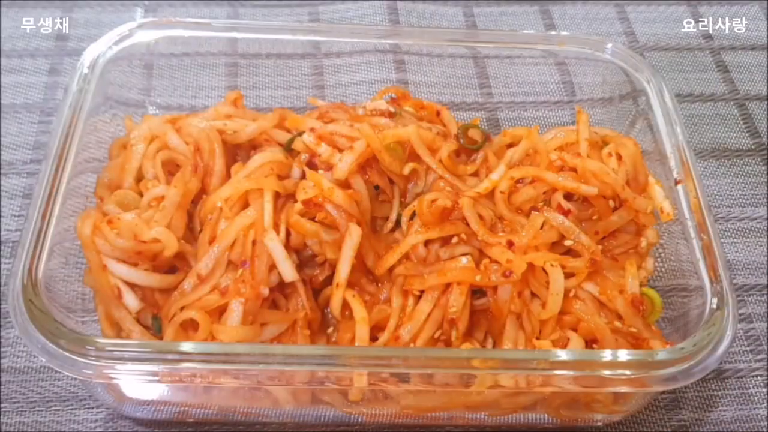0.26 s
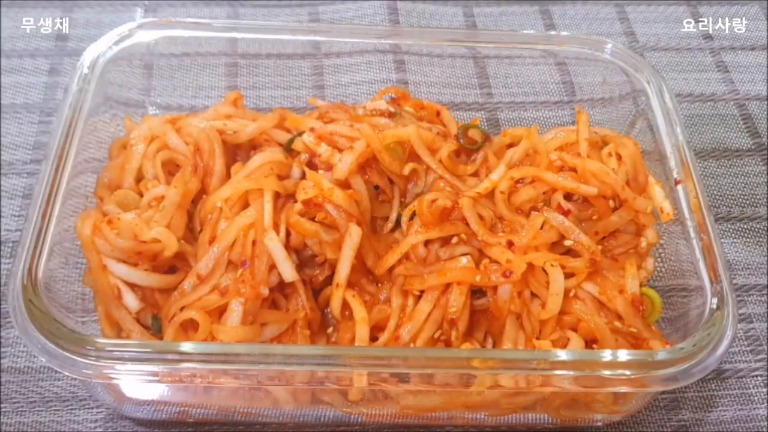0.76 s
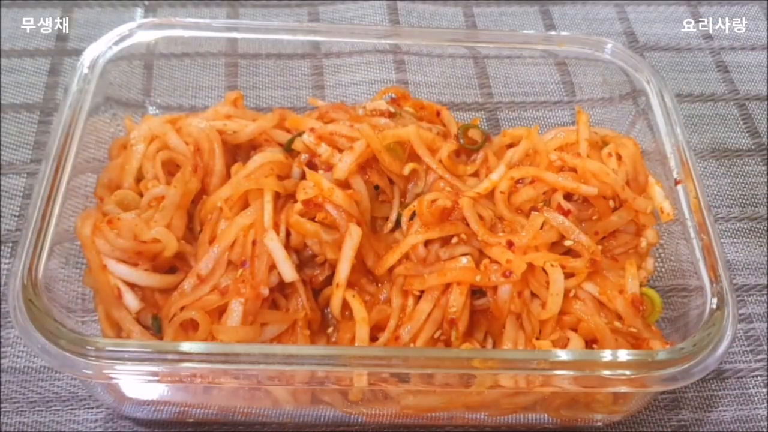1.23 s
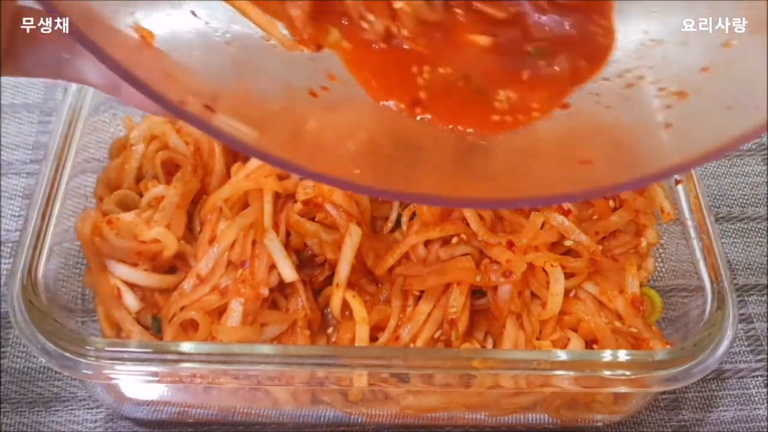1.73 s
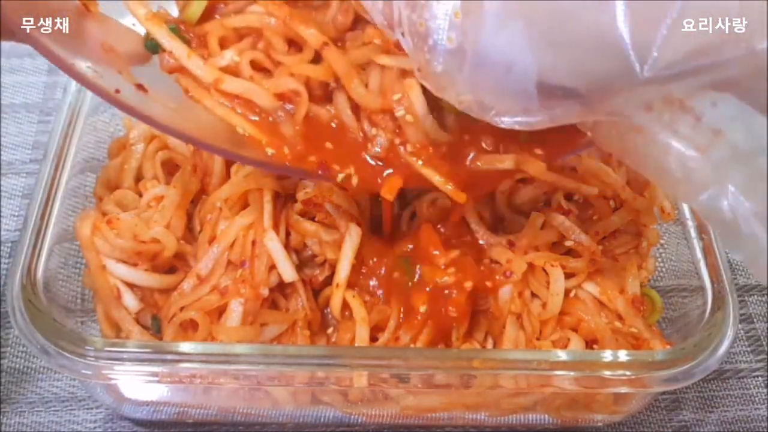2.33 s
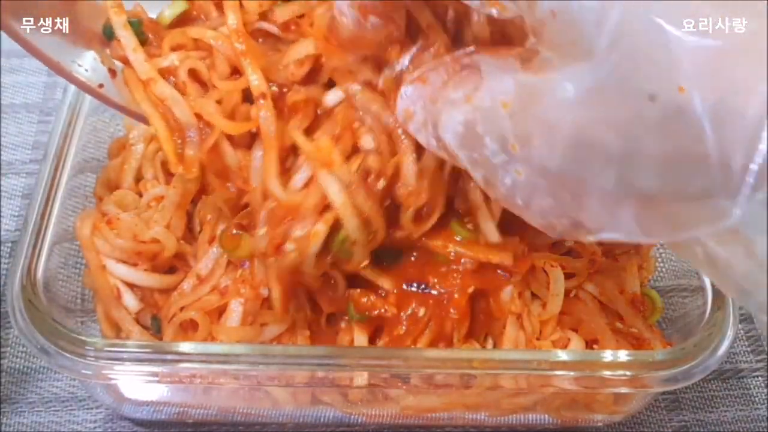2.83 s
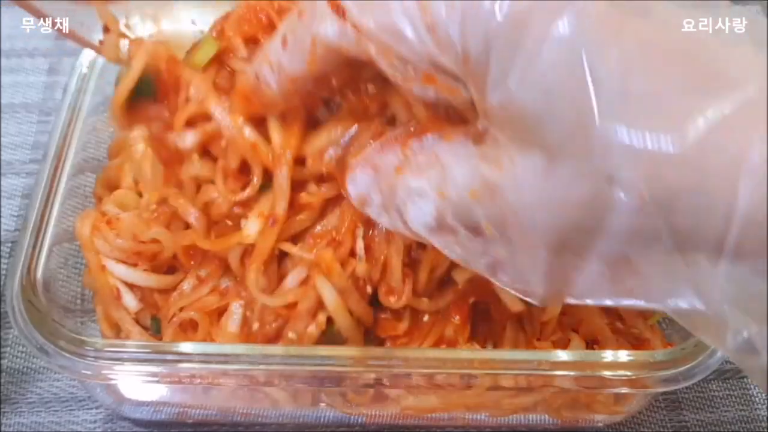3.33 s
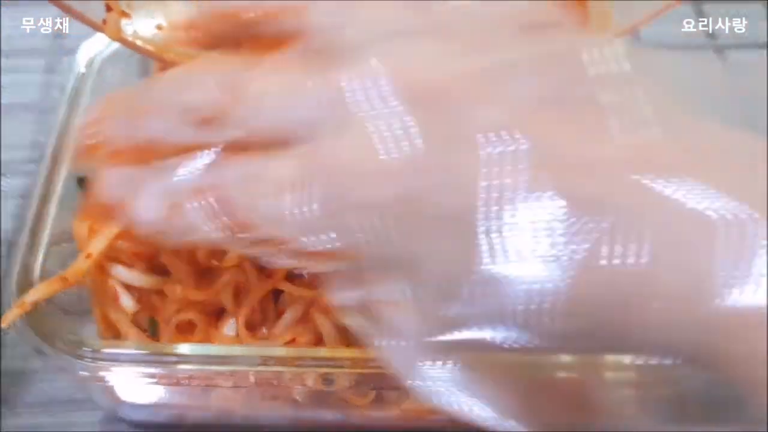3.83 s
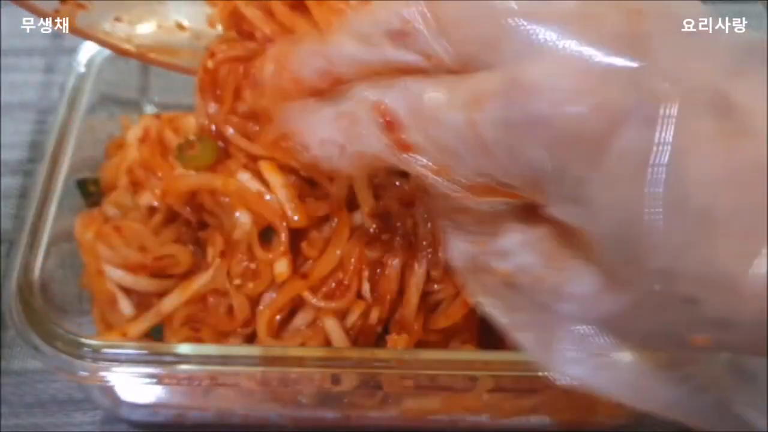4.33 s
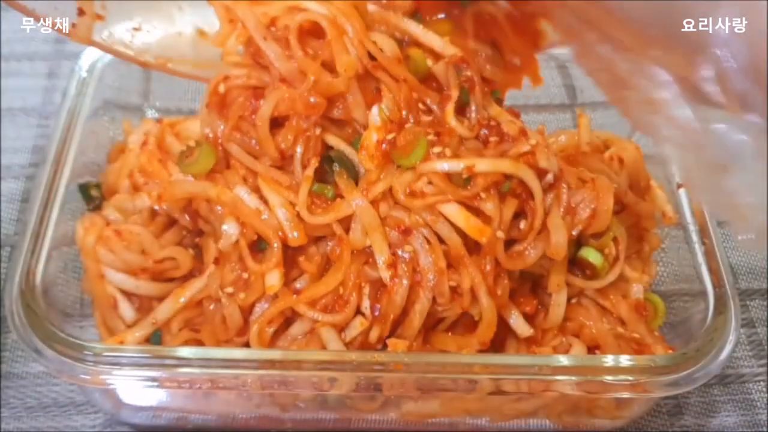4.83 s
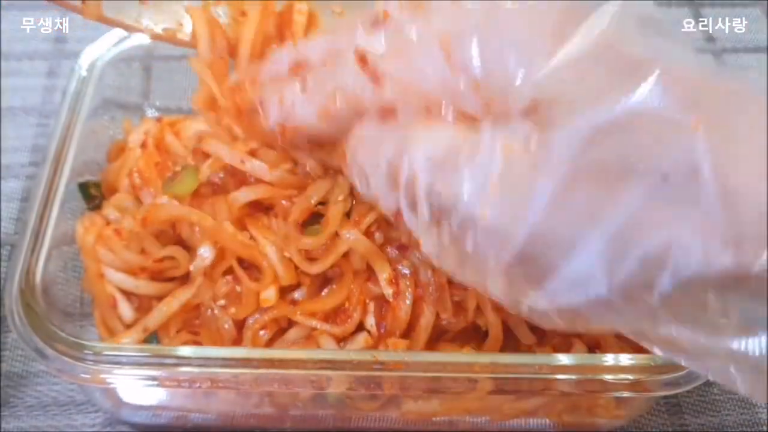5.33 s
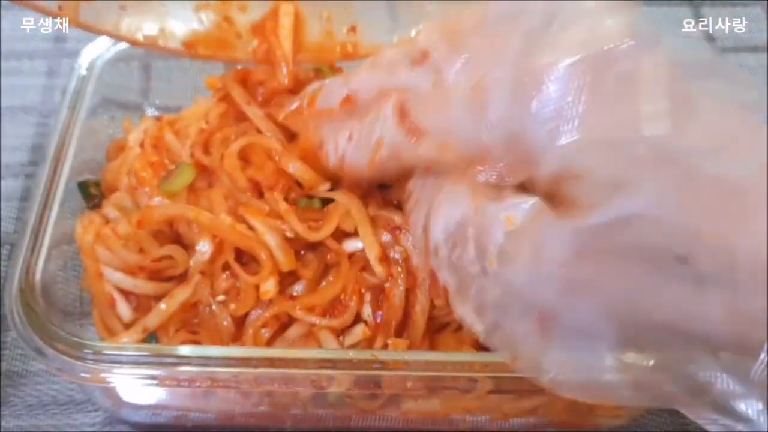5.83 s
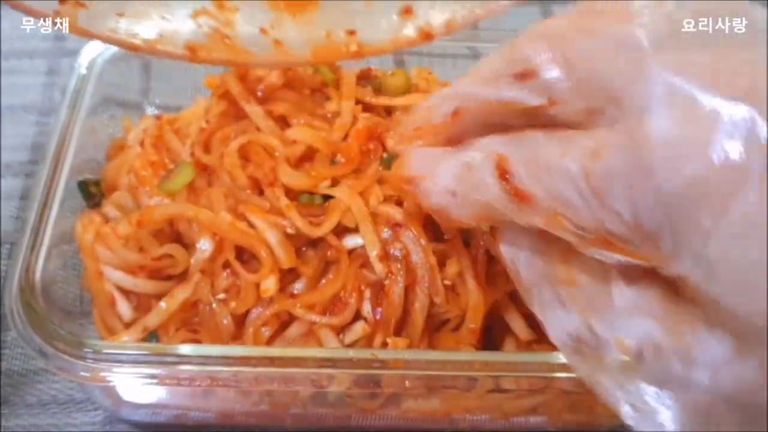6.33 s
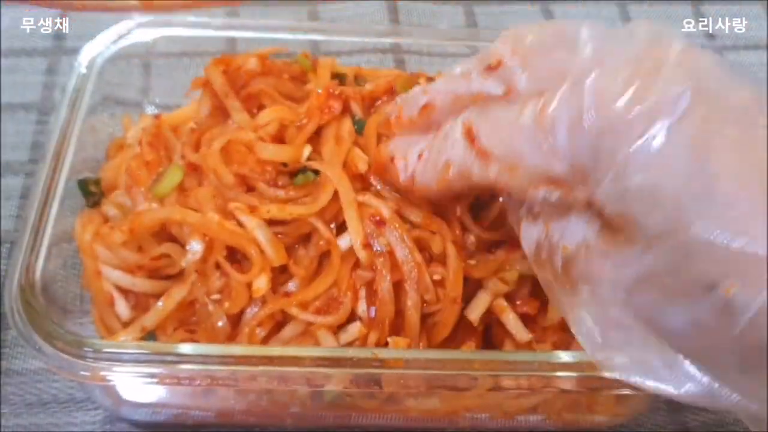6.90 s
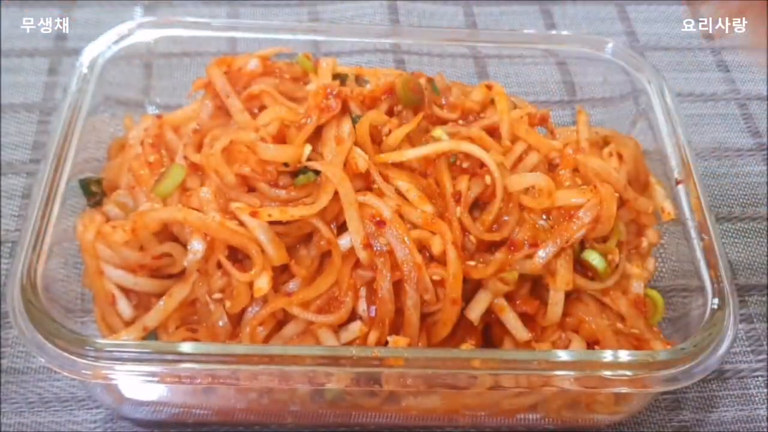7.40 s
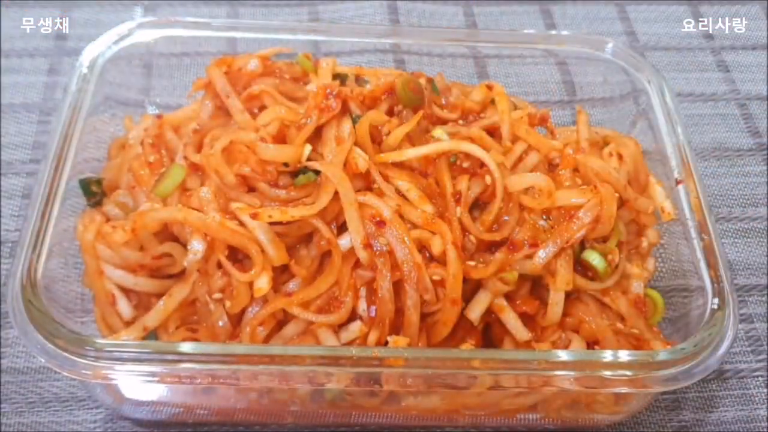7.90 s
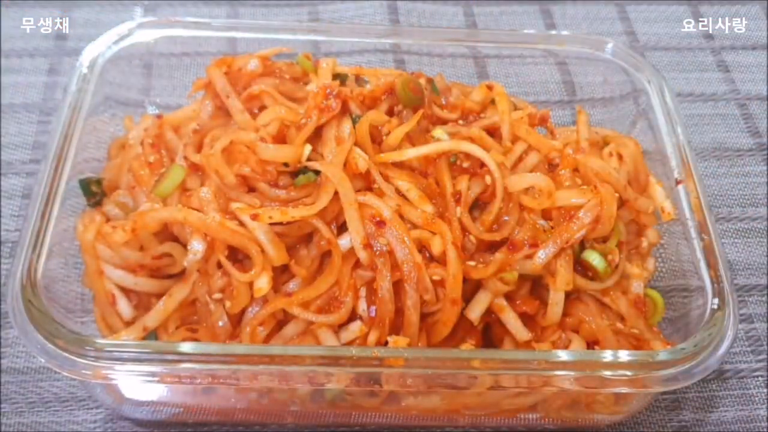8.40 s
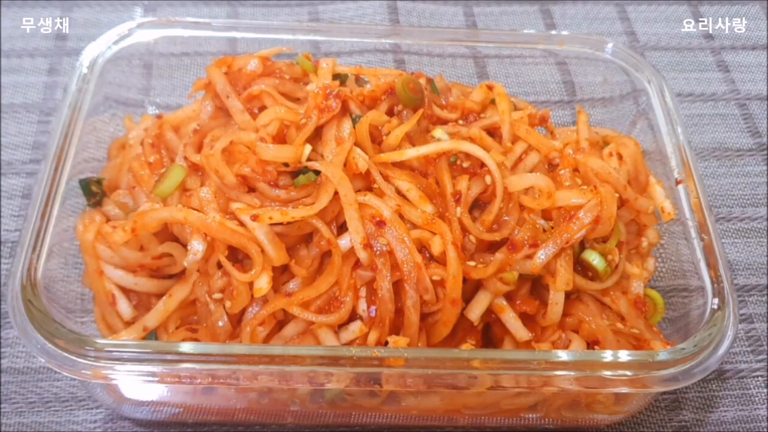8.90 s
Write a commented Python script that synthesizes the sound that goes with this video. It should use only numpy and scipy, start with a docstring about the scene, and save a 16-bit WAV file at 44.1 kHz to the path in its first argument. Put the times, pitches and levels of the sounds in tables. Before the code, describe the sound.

A thin plastic glove crinkles as wet shredded vegetables squelch out of a bowl, which is then set down with a knock.

```python
"""Gloved hand moving wet shredded vegetables

A hand in a thin plastic glove pushes wet shreds out of a bowl in a small kitchen. The film buckles
in tiny snaps; strands part and air pockets ring, making a squelch. Sliding food excites the bowl's
modes, which rise in pitch as it empties. The bowl meets the table in two knocks and a faint third.
The walls reverberate, and an appliance hums quietly behind."""
import sys
import numpy as np
from scipy import signal
from scipy.fft import irfft, next_fast_len
from scipy.io import wavfile
from scipy.ndimage import uniform_filter1d

SR = 44100
rng = np.random.default_rng(int(sys.argv[2]) if len(sys.argv) > 2 else 0)


def log_audio(samples):
    """Write samples as a 16-bit WAV file to the path given in sys.argv[1]."""
    # one column per channel
    frames = np.atleast_2d(samples).T
    # limit to full scale, then quantise
    limited = np.clip(frames, -1, 1)
    pcm = np.round(limited * 32767).astype(np.int16)
    wavfile.write(sys.argv[1], SR, pcm)


N = 403756

# modes of the bowl: (frequency [Hz], level [dB], t60 [s], left minus right [dB])
BOWL_MODES = [(853, 0, .25, -4), (834, -9, .24, 0), (1415, -4.5, .2, 7), (1447, -13, .2, 3),
              (2110, -5, .12, 6), (2170, 5, .045, 5), (2410, -18, .09, 4), (3110, -15, .08, 4),
              (5780, -9, .06, 1)]
# spectrum of the plastic film: (frequency [Hz], level [dB])
FILM_SPECTRUM = [(500, -25), (1200, -9), (2200, -2.5), (3100, -2.5), (4300, -1), (6000, -2), (9000, -4),
                 (12500, -3), (16000, -1.5)]


def glove(bending):
    """Buckling: bent film crackles over a soft swish; a large crease pops, then flutters briefly."""
    # large creases: (time [s], level [dB], left minus right [dB])
    snaps = [(1.1717, -48, -3), (1.3004, -35.5, -1), (1.3704, -36.5, 3), (1.5299, -47, -2),
             (1.678, -48, -3), (1.8267, -41, 1.0), (1.8529, -39, 1), (1.9415, -35, -1), (1.9725, -39, 0),
             (2.0525, -37, -1), (2.145, -41.5, -3), (2.27, -49, 1.0), (2.3143, -44.5, -0.5),
             (2.583, -29, 7), (2.637, -40.5, -3), (2.7066, -36.5, 4), (2.8825, -36, 2), (2.8917, -39, 0.0),
             (2.9377, -36, 1.5), (3.018, -37.5, 1.5), (3.0659, -38, -3), (3.079, -38.5, 3.0),
             (3.14, -45, -1), (3.1677, -33, 4), (3.267, -40, 1.0), (3.3553, -35.5, 1.0), (3.432, -41.5, -6),
             (3.5632, -40.5, 4.0), (3.68, -42, 2.5), (3.8177, -33, -2), (3.841, -31, 0.0),
             (4.0117, -38, -3), (4.0647, -35, 3.5), (4.2245, -43, 2.5), (4.2766, -35, 2), (4.3074, -39, 6),
             (4.372, -37, 1), (4.4631, -38, -5), (4.4825, -34.5, 2), (4.5243, -41, 2.0), (4.651, -39, 7),
             (4.674, -36, 5), (4.7154, -39, 6), (4.813, -30.5, 6), (4.8885, -38, 8), (4.9216, -31, 9),
             (4.9556, -39, 4), (5.0365, -39, 2.5), (5.256, -38, 0), (5.3628, -37, 3), (5.6345, -52, 0.0),
             (5.6536, -34.5, 0), (5.7156, -37.5, 5), (5.8174, -32.5, 0), (5.905, -42, 4), (5.947, -38, 0),
             (5.9882, -35, 2), (6.1993, -34.5, 0), (6.4804, -42, 1.5), (6.552, -34, -2), (6.6528, -39, 0.5),
             (6.6967, -45, 7), (8.4406, -45, 6.5), (8.4655, -52.5, 16)]
    crackle = grains(crease, per_s=950, size_db=5.4, clump_db=4.5)
    swish = from_db(-16) * noise(FILM_SPECTRUM)
    out = bending * (crackle + swish) * pan(2.4)
    for s, db, side_db in snaps:
        pop = from_db(-3) * crease()
        flutter = from_db(-14) * burst(FILM_SPECTRUM, t60=.025, size=1024)
        add(out, s, from_db(db) * (pop + flutter) * pan(side_db))
    return out


def crease():
    """Snap-through: each facet of the film flips with a broad resonance of its own."""
    facet_hz = 7500 * 2 ** rng.normal(0, .8)
    return burst(resonant(FILM_SPECTRUM, facet_hz, boost_db=6.5, octaves=.4), t60=.008, size=1024)


def food(squeeze, sliding):
    """Mass loading: wet shreds squelch, slide and bump in a bowl that rings higher as it empties."""
    # air pockets opening between strands: (time [s], level [dB], frequency [Hz])
    smacks = [(2.054, -35, 2570), (2.185, -45, 2580), (2.218, -41, 2700), (2.314, -44, 2310),
              (2.479, -44, 1940), (4.931, -36, 2340), (5.183, -44, 2450), (5.976, -41, 1950),
              (7.05, -52, 1820), (7.157, -47, 1820), (7.561, -58, 2730), (8.687, -56.5, 2560)]
    # food bumping the bowl: (time [s], level [dB], pitch of the loaded bowl [Hz])
    bumps = [(0.195, -59, 630), (0.73, -58.5, 683), (1.048, -56, 593), (1.21, -58, 596), (1.35, -60, 727),
             (1.922, -52, 680), (2.051, -54.5, 730), (2.144, -43.5, 780), (2.217, -47.5, 659),
             (2.234, -57, 827), (2.31, -55.5, 807), (2.405, -53, 720), (2.495, -49.5, 805),
             (2.571, -56, 824), (2.795, -56, 824), (2.952, -50, 820), (3.065, -59, 846),
             (3.307, -55.5, 865), (4.92, -54, 770), (6.199, -55.5, 784)]
    loaded_hz, emptied_hz, emptying_s = 680, 820, (1.8, 2.33)
    out = squeeze * from_db(4.0) * grains(strand, per_s=500, size_db=1.5, clump_db=4.0) * pan(1.2)
    emptied = np.interp(np.arange(N) / SR, emptying_s, (0, 1))
    out += sliding * (np.sqrt(1 - emptied) * slither(loaded_hz) + np.sqrt(emptied) * slither(emptied_hz))
    for s, db, hz in smacks:
        add(out, s, from_db(db) * air_pocket(hz))
    for s, db, hz in bumps:
        add(out, s, from_db(db) * bump(hz))
    return out


def strand():
    """Rupture of a wet contact: a strand parts with a smack and the pop of a small cavity."""
    smack = burst(shred_spectrum(), t60=0.016, size=1024)
    return smack + from_db(-5) * air_pocket(2050 * 2 ** rng.normal(0, 0.36))


def shred_spectrum():
    """Broadband radiation: the brief smack of wet shreds is strongest in the middle frequencies."""
    # spectrum of a smack: (frequency [Hz], level [dB])
    spectrum = [(400, -8.5), (800, -6), (1150, -5.5), (1700, -4.5), (2300, -4), (3200, -7.5), (6000, -12.5),
                (16000, -25)]
    return spectrum


def air_pocket(hz):
    """Cavity resonance: a tiny wet pocket rings briefly, rising in pitch as it opens."""
    t = np.arange(1024) / SR
    phase = 2 * np.pi * hz * t * (1 + 4 * t) + rng.normal(0, 1.0, (2, 1))
    return np.sin(phase) * decay(28 / hz, len(t)) * (1 - decay(0.0067, len(t)))


def slither(hz):
    """Superposition: many soft touches on the bowl's wall merge into a ring near one pitch."""
    return grains(lambda: bump(hz * rng.uniform(.93, 1.05)), per_s=250, size_db=3.5, clump_db=3.5, count=5)


def bump(hz, size=4000):
    """Damped impact: soft food gives a dull knock and a hollow ring that the load shortens."""
    # spectrum of the bowl's wall: (frequency [Hz], level [dB])
    wall_spectrum = [(100, -14.5), (220, -5.5), (330, 5.5), (500, -4.5), (680, 1), (770, 1), (860, -6),
                     (930, -34), (2000, -13.5), (6000, -34)]
    knock = burst(wall_spectrum, t60=0.093, size=size) * (1 - decay(0.0038, size))
    hollow = ringing(BOWL_MODES, hz / BOWL_MODES[0][0], contact_hz=411, size=size) * decay(0.33, size)
    return knock + from_db(9.5) * hollow


def bowl_set_down(size=24000):
    """Impact excitation: each knock gives a clack and a thud, and sets bowl and table ringing."""
    # bowl meets table: (time [s], bowl ring [dB], clack [dB], thud [dB], pitch [ratio],
    # contact cut-off [Hz], resonance of the struck spot [Hz])
    knocks = [(7.9473, -18, -22.5, -24, 1, 900, 4250), (8.0747, -27, -23, -30.5, 1, 6900, 2130),
              (8.172, -43, -66, -41, .98, 300, 2130)]
    # modes of the table top: (frequency [Hz], level [dB], t60 [s], left minus right [dB])
    table_modes = [(188, -14, 0.36, -1), (317.5, 0, 0.11, -3.5), (427, -7, 0.21, 1.5)]
    # spectra of the bowl's clack and the table's thud: (frequency [Hz], level [dB])
    clack_spectrum = [(200, -2.5), (650, -1), (880, 11.5), (1150, -8.5), (1800, 0), (2150, 0), (2600, -0.5),
                      (3100, -4.5), (4400, -10.5), (5300, -16), (8000, -19), (16000, -24)]
    thud_spectrum = [(30, -35), (80, -6.5), (120, -2.5), (160, 9), (220, -7.5), (310, -4), (480, 0),
                     (700, -20), (1500, -15.5), (5000, -67.5)]
    impact, ring = np.zeros((2, 2, N))
    for s, ring_db, clack_db, thud_db, pitch, contact_hz, spot_hz in knocks:
        add(ring, s, from_db(ring_db) * ringing(BOWL_MODES, pitch, contact_hz))
        add(ring, s, from_db(thud_db) * ringing(table_modes, pitch=0.93, contact_hz=contact_hz))
        clack = burst(resonant(clack_spectrum, spot_hz, boost_db=8, octaves=.14), t60=.026)
        add(impact, s, from_db(clack_db) * clack * pan(5.8))
        thud = band_pass(burst(thud_spectrum, t60=0.096, size=size), 70, min(contact_hz, 8000))
        add(impact, s, from_db(thud_db) * thud * pan(2.0))
    return impact, ring


def bowl_rumble(shaking):
    """Forced vibration: handling shakes the bowl at low frequencies, above a faint constant rumble."""
    # spectrum of the rumble: (frequency [Hz], level [dB])
    rumble_spectrum = [(25, -11), (55, -26), (68, 2.5), (77, 2), (90, -2.5), (130, -17.5), (400, -50.5)]
    rest_db = -74
    return np.hypot(shaking, from_db(rest_db)) * noise(rumble_spectrum) * pan(1.2)


def kitchen(x, size=22000):
    """Reverberation: diffuse reflections from the walls decay at their own rate in each band."""
    # reverberation time: (frequency [Hz], t60 [s])
    decay_times = [(150, 0.18), (700, 0.35), (2500, 0.42), (6000, 0.32), (14000, 0.37)]
    edges_hz, tail = np.geomspace(60, 18000, 9), 0
    for low, high in zip(edges_hz, edges_hz[1:]):
        band = band_pass(rng.standard_normal((2, size)), low, high)
        tail = tail + band * decay(at_hz(decay_times, np.sqrt(low * high)), size)
    build_up = 1 - decay(0.0057, size)
    response = unit_rms(tail * build_up) / np.sqrt(size)
    return signal.oaconvolve(x, response, axes=1)[:, :N]


def background():
    """Amplitude and phase modulation: an appliance's tones waver over steady air noise."""
    # tones of the appliance: (frequency [Hz], level [dB])
    tones = [(108, -74.5), (334, -71.5), (364, -67.5)]
    # spectrum of the air noise: (frequency [Hz], level [dB])
    air_spectrum = [(25, -16.5), (55, -9.5), (85, -23.5), (110, 0), (150, -18), (220, -14), (290, -8.5),
                    (350, -10.5), (390, -7.5), (440, -21), (700, -20.5), (1100, -27), (1350, -30.5),
                    (1520, -19.5), (1700, -34), (2600, -38.5), (3500, -49.5), (7300, -46), (10600, -28.5),
                    (13000, -45), (16000, -47)]
    t, hum = np.arange(N) / SR, 0
    for hz, db in tones:
        amplitude = from_db(db + 2.57 * drift(8)) * np.sqrt(2)
        hum = hum + amplitude * np.sin(2 * np.pi * hz * t + 0.69 * drift(12))
    return (hum + from_db(-64.5) * noise(air_spectrum)) * pan(2.3)


def grains(tick, per_s, size_db, clump_db, count=16):
    """Shot noise: `count` kinds of tick, each from its own place, in random clumps of uneven size."""
    born = rng.random(N) < per_s * from_db(clump_db * drift(70)) / SR
    clicks = born * from_db(size_db * np.minimum(rng.exponential(1, N), 4)) * rng.choice([-1, 1], N)
    kind, out = rng.integers(0, count, N), 0
    for k in range(count):
        placed_tick = tick() * pan(rng.normal(0, 3.2))
        out = out + signal.oaconvolve((clicks * (kind == k))[None], placed_tick, axes=1)[:, :N]
    power = np.maximum(uniform_filter1d(np.mean(out ** 2, axis=0), size=3000), 0)
    return out / np.sqrt(power + 0.012 * power.mean())   # evens out the level


def ringing(modes, pitch, contact_hz, size=24000):
    """Modal synthesis: damped sines, scaled in frequency by `pitch`; a soft contact spares high ones."""
    out, t = 0, np.arange(size) / SR
    for hz, db, t60, side_db in modes:
        ear_phase = np.array([[0], [1.35 * min(hz / 850, 1)]])   # higher modes arrive out of step
        mode = np.sin(2 * np.pi * hz * pitch * t + ear_phase) * decay(t60, size)
        out = out + from_db(db) / (1 + (hz / contact_hz) ** 2) * mode * pan(side_db)
    return out * (1 - decay(0.021, size))


def burst(spectrum, t60, size=8192):
    """Modal overlap: the dense resonances of one short contact decay together as noise."""
    fade = decay(t60, size)
    return unit_rms(noise(spectrum, size) * fade) * np.sqrt(np.mean(fade ** 2))


def noise(spectrum, size=N):
    """Diffuse field: coloured stereo noise near unit rms, most alike at the two ears in the bass."""
    # likeness of left and right: (frequency [Hz], coherence [ratio])
    coherence = [(60, 0.98), (300, 0.65), (640, 0.56), (1400, 0.142), (4000, 0.084)]
    hz = np.fft.rfftfreq(next_fast_len(max(size, 4096)), 1 / SR)
    mid, side = np.exp(2j * np.pi * rng.random((2, len(hz))))
    alike = np.clip(at_hz(coherence, hz), -1, 1)
    both = np.sqrt(1 + alike) * mid + np.sqrt(1 - alike) * side * [[1], [-1]]
    return unit_rms(irfft(both * from_db(at_hz(spectrum, hz)) * (hz > 15)))[:, :size]


def gestures(rows, attack_s, release_s):
    """Incoherent addition: movements swell, hold and fade by 60 dB; their powers add to one gain."""
    t, power = np.arange(N) / SR, np.zeros(N)
    for start, length, db in rows:
        span = slice(int(start * SR), int((start + length + release_s) * SR))
        age = t[span] - start
        swell = np.minimum(age / attack_s, 1)
        fade = np.exp(-np.log(1000) * np.maximum(age - length, 0) / release_s)
        power[span] += (from_db(db) * swell * fade) ** 2
    return np.sqrt(power)


def resonant(spectrum, hz, boost_db, octaves):
    """Resonance: one peak raised out of a spectrum."""
    f = np.geomspace(25, 16000, 300)
    return np.c_[f, at_hz(spectrum, f) + boost_db / (1 + (np.log2(f / hz) / octaves) ** 2)]


def band_pass(x, low_hz, high_hz):
    """Filtering to one band."""
    return signal.sosfilt(signal.butter(2, [low_hz, high_hz], "band", fs=SR, output="sos"), x)


def decay(t60, size):
    """Exponential decay of 60 dB in t60 seconds."""
    return from_db(-60 * np.arange(size) / SR / t60)


def drift(per_s):
    """Random modulation about zero, with a spread near 1."""
    return np.interp(np.arange(N) / SR * per_s, np.arange(4096), rng.standard_normal(4096))


def at_hz(points, hz):
    """Interpolation along log frequency."""
    f, value = np.transpose(points)
    return np.interp(np.log(hz + 1e-9), np.log(f), value)


def pan(db):
    """Interaural level difference as left and right gains."""
    return from_db(np.array([[db], [-db]]) / 2)


def from_db(db):
    """Decibels to amplitude ratio."""
    return 10 ** (np.asarray(db) / 20)


def unit_rms(x):
    """Normalisation to unit power."""
    return x / np.sqrt(np.mean(x ** 2) + 1e-20)


def add(out, s, x):
    """Superposition of x on out at s seconds."""
    at = int(s * SR)
    out[:, at:at + x.shape[1]] += x[:, :N - at]


def scene():
    """Common excitation: each press bends the film, squeezes the food and shakes the bowl."""
    # presses of the hand: (start [s], length [s], glove level [dB], shred level [dB])
    presses = [(0.18, 0.062, -89, -86), (0.695, 0.076, -86, -73), (1.024, 0.053, -74, -66.5),
               (1.17, 0.085, -74, -71), (1.281, 0.13, -59.5, -67), (1.824, 0.093, -61, -73),
               (1.935, 0.046, -57.5, -64), (2.034, 0.021, -64, -62), (2.404, 0.12, -62, -66),
               (2.548, 0.072, -59.5, -65), (2.881, 0.076, -59.5, -70.5), (3.069, 0.12, -49, -59.5),
               (3.2, 0.14, -60, -68.5), (3.426, 0.042, -58, -77), (3.663, 0.039, -52.5, -64.5),
               (3.806, 0.083, -58, -62.5), (3.9, 0.072, -53.5, -68.5), (4.052, 0.088, -54, -67.5),
               (4.297, .13, -57.5, -68.5), (4.45, 0.04, -55.5, -68), (4.6, 0.14, -58.5, -66.5),
               (4.692, 0.13, -50, -59.5), (4.843, 0.12, -51.5, -63.5), (5.0, 0.11, -58.5, -63),
               (5.609, 0.06, -56.5, -70), (5.711, 0.024, -53, -70), (5.946, 0.045, -54.5, -63.5),
               (6.078, 0.017, -61, -68.5), (6.185, 0.021, -53, -64.5), (6.286, 0.026, -61, -67),
               (6.388, .06, -57.5, -68), (6.45, 0.12, -54.5, -66), (6.73, 0.051, -64, -88),
               (7.011, 0.057, -63, -75), (7.13, 0.033, -63, -71), (7.543, 0.053, -82, -81),
               (8.437, 0.065, -73, -74)]
    # light rustle of the moving hand: (time [s], level [dB])
    rustle_curve = [(0.0, -100), (0.4, -90), (0.7, -71.5), (0.95, -68.5), (1.78, -69), (2.15, -69),
                    (2.37, -69), (3.3, -62), (3.58, -68), (3.9, -62), (4.56, -65.5), (5.15, -63),
                    (5.43, -67.5), (5.85, -66), (6.65, -70), (7.25, -82), (7.75, -90), (9.16, -96)]
    # clumps sliding down the wall: (start [s], length [s], level [dB])
    slides = [(0.165, 0.051, -65), (0.42, 0.32, -66), (0.68, 0.094, -65), (1.18, 0.075, -62),
              (1.88, 0.27, -66.5), (2.12, 0.092, -65), (2.42, 0.067, -63), (2.66, 0.16, -64),
              (2.91, .07, -69), (3.27, 0.093, -64)]
    # the bowl is tipped further: (start [s], length [s], level [dB])
    tips = [(0.1, .75, -68.5), (0.37, 0.31, -60), (1.23, 0.29, -64), (1.98, 0.2, -55), (2.3, 0.55, -66.5)]
    rustle = from_db(np.interp(np.arange(N) / SR, *np.transpose(rustle_curve)))
    grip_s, relax_s = 0.0068, .12
    on_film = gestures([(s, length, db) for s, length, db, _ in presses], grip_s, relax_s)
    on_food = gestures([(s, length, db) for s, length, _, db in presses], grip_s, relax_s)
    squeeze = np.hypot(on_food, from_db(-6) * rustle)   # even a light touch squelches
    sliding = np.hypot(gestures(slides, attack_s=0.032, release_s=0.22), from_db(-0.5) * squeeze)
    shaking = np.hypot(gestures(tips, attack_s=0.056, release_s=0.45), from_db(-7) * squeeze)
    film = glove(np.hypot(on_film, rustle))
    shreds = food(squeeze, sliding)
    rumble = bowl_rumble(shaking)
    impact, ring = bowl_set_down()
    to_walls = from_db(-10) * film + from_db(-6.5) * shreds + from_db(-3) * impact + from_db(-17) * ring
    return film + shreds + impact + ring + rumble + kitchen(to_walls) + background()


def record(dry):
    """Band limiting: a steep low-pass filter removes the highest treble."""
    cutoff_hz = 16300
    return signal.sosfilt(signal.ellip(10, .1, 70, cutoff_hz, fs=SR, output="sos"), dry)


dry = scene()
out = record(dry)
log_audio(out)
```